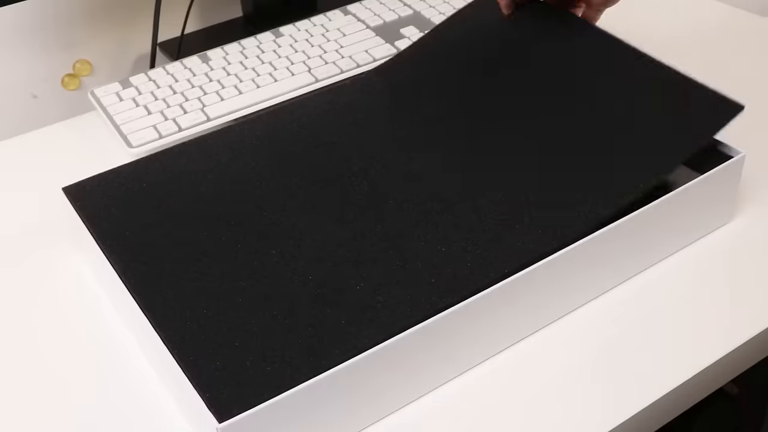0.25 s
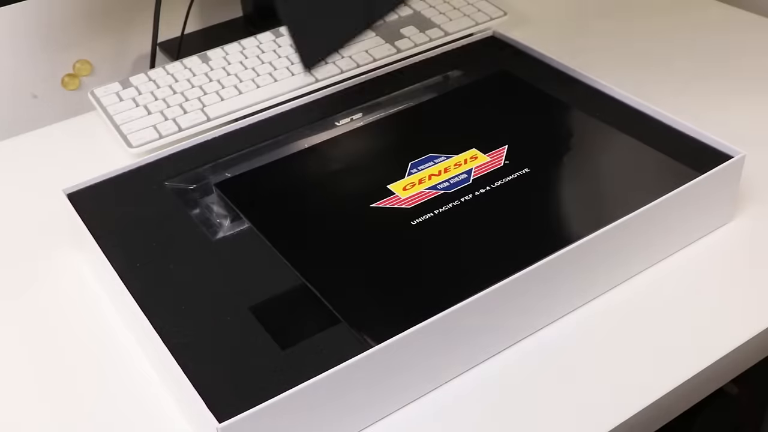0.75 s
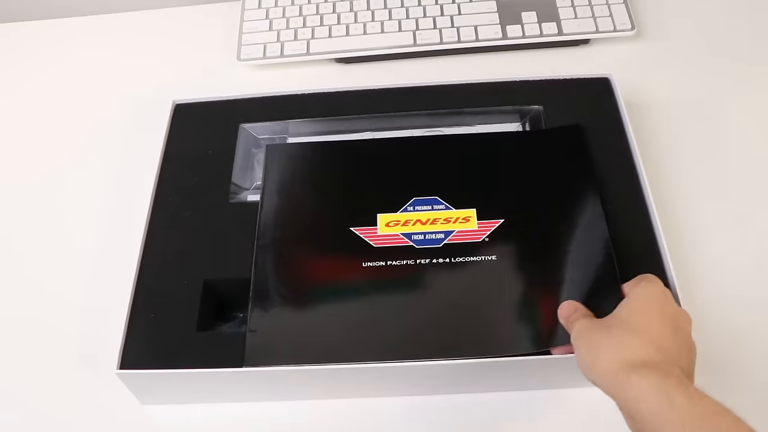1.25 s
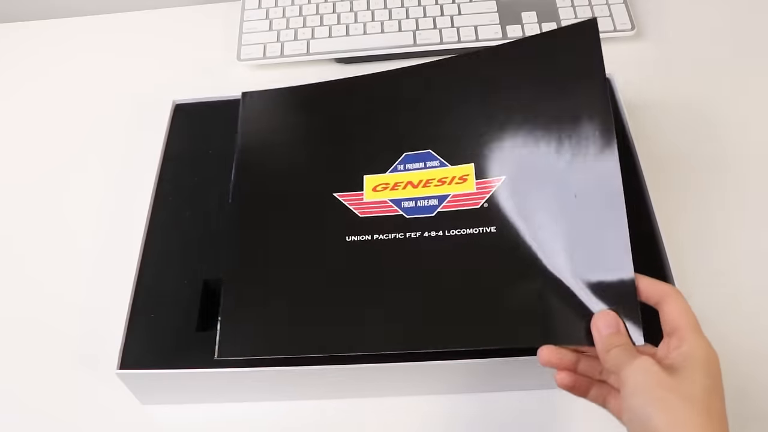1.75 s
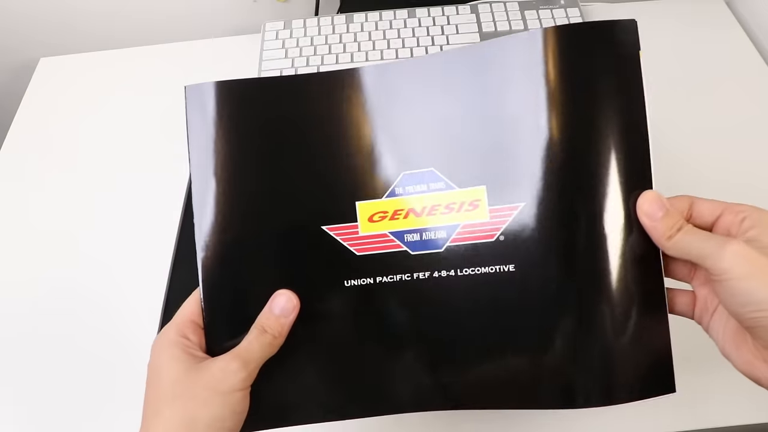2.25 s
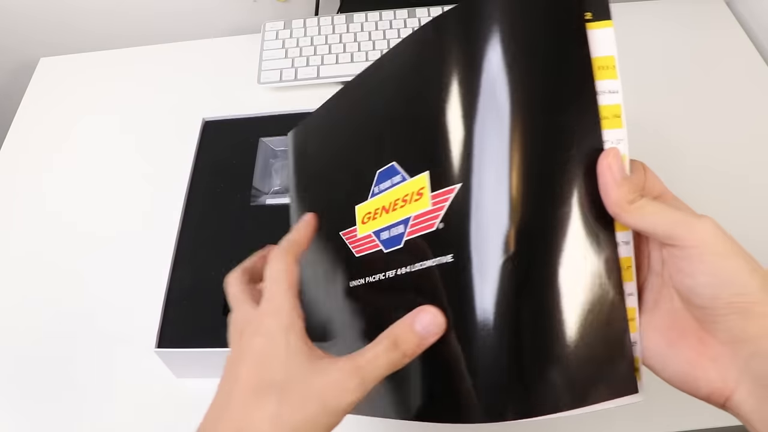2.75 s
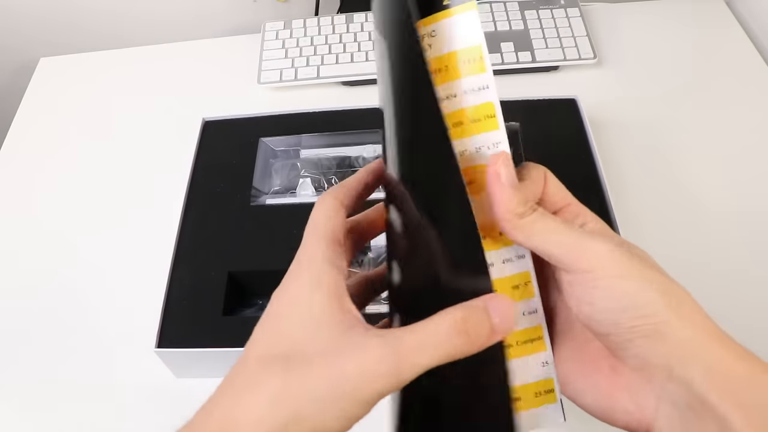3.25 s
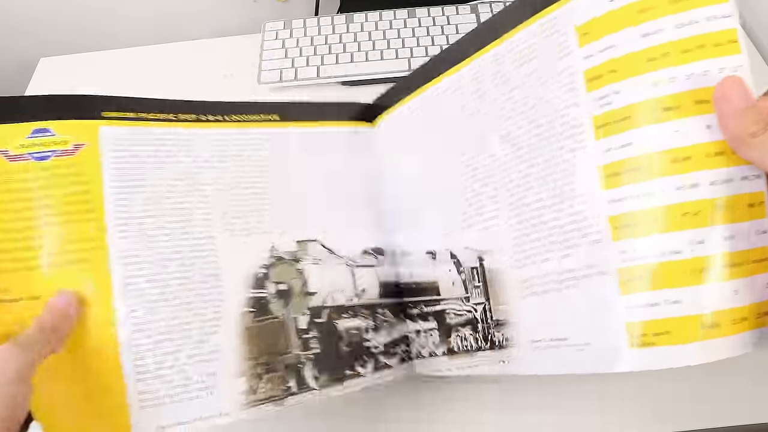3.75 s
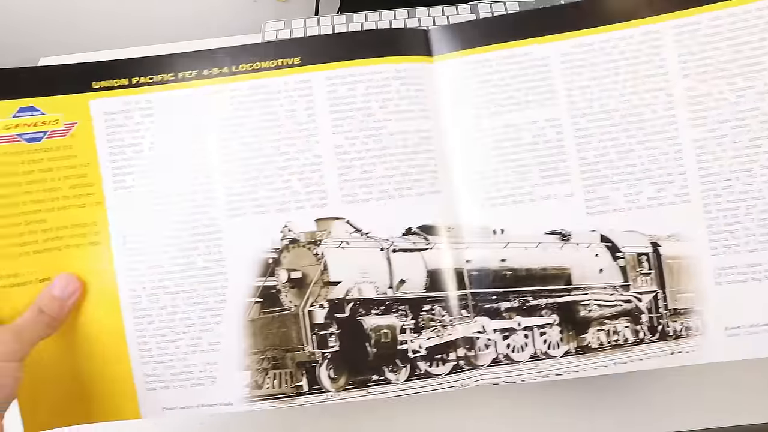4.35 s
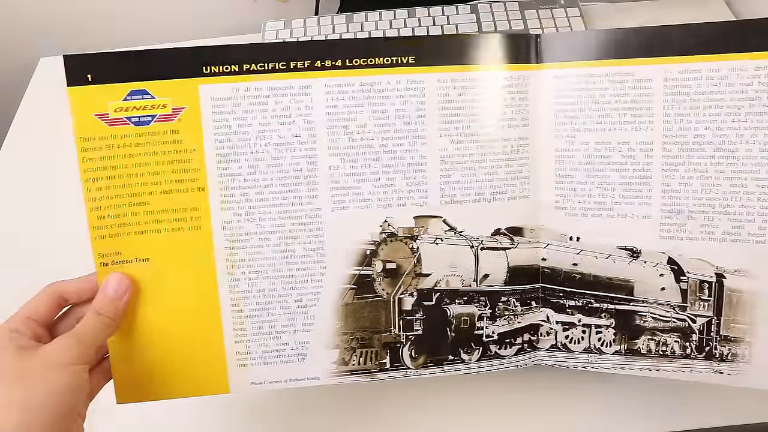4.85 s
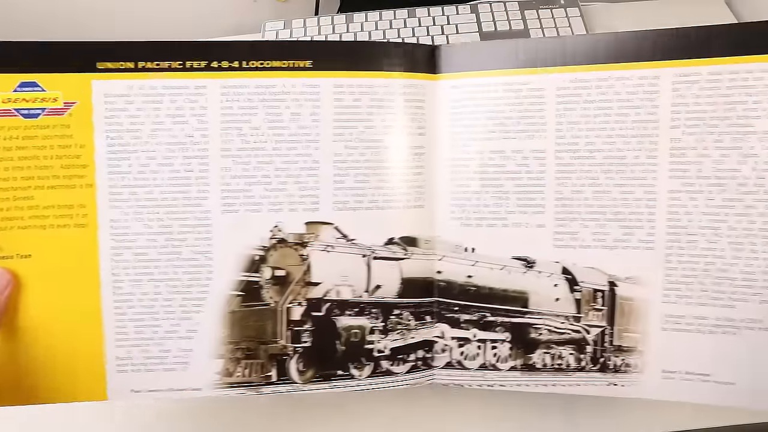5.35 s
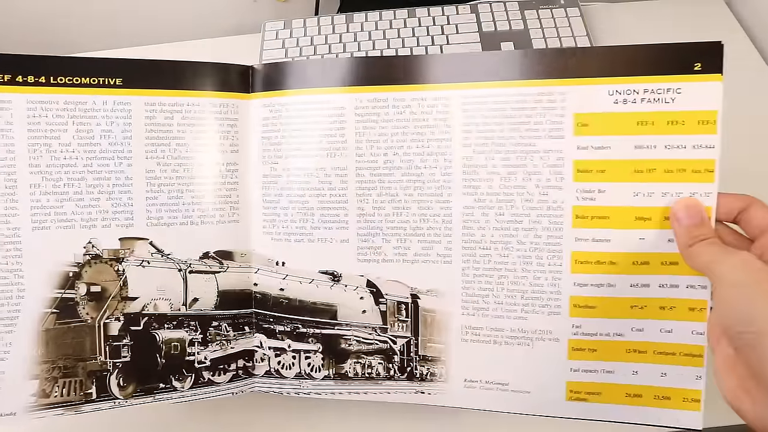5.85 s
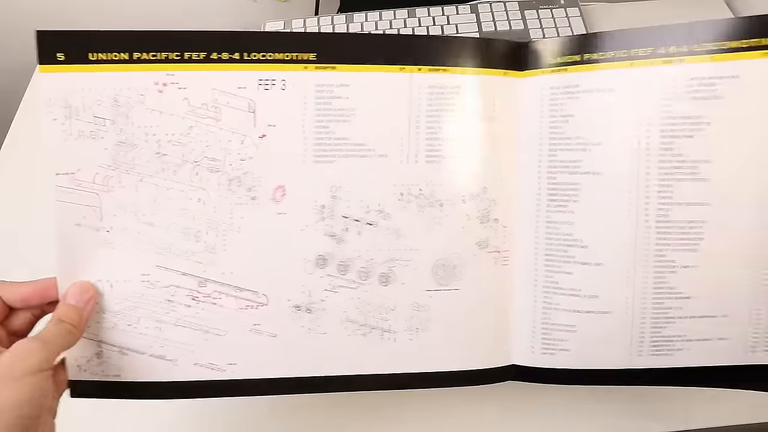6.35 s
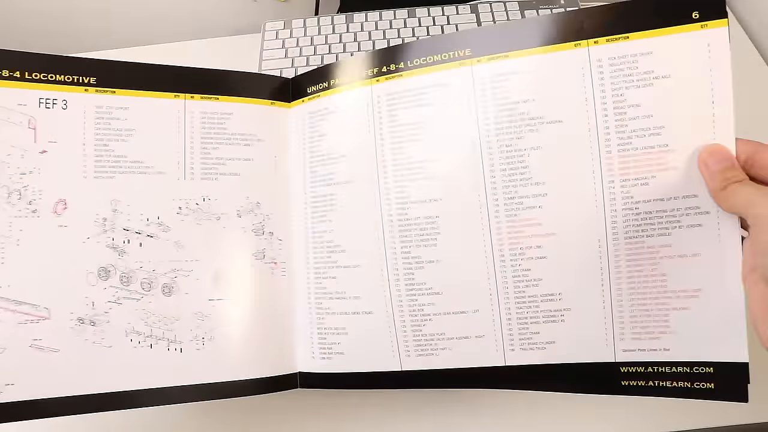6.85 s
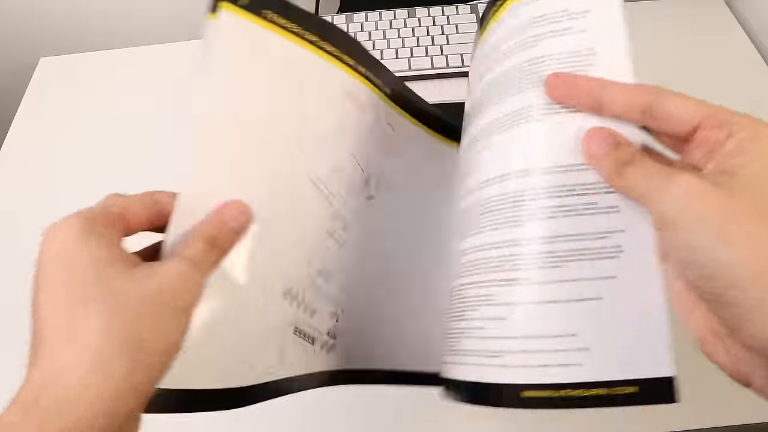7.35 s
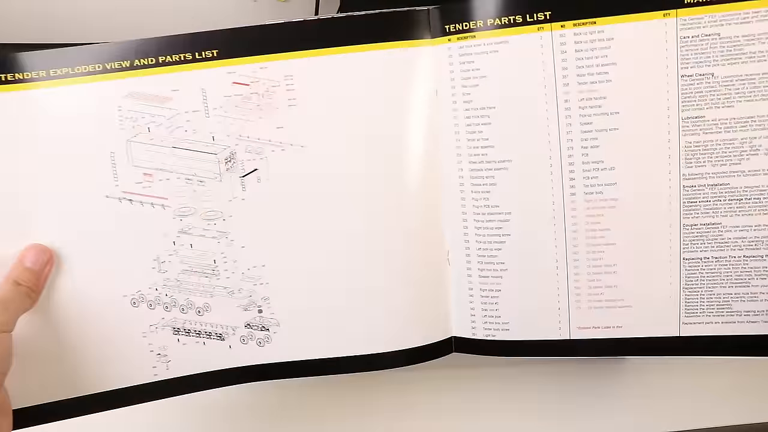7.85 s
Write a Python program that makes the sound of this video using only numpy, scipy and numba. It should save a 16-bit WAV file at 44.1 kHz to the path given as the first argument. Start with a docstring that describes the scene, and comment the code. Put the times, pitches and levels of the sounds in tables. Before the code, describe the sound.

Close stereo capture at a desk: low fan air throughout, quiet box knocks and foam friction first, then hissing, drumming slides of coated paper. One hard edge snap comes before a dense burst of buckling pages. Handling thins to faint bumps and ticks, and finally pages rustle, chirp and crack again, with short small-room reflections.

```python
"""Over the air noise and wavering tones of a computer fan, foam lifted off a box makes its walls ring.
Friction of foam, pages and fingers rasps, drums and hisses; edges tap and flick, and hands bump softly.
The glossy coating also chirps, slipping pages glide in pitch, and creases tick lightly.
Stiff pages bow and snap as bending waves spread; in a quieter stretch a fingertip whistles faintly on the gloss.
A small room answers all but the fan with sparse reflections and a diffuse tail."""
import sys
import numpy as np
from scipy import signal
from scipy.fft import rfft, irfft, next_fast_len
from scipy.io import wavfile
from scipy.ndimage import uniform_filter1d
from numba import njit

SR = 44100
rng = np.random.default_rng(int(sys.argv[2]) if len(sys.argv) > 2 else 0)


def generate_wav(sig):
    """Save sig (samples, or channels by samples) to the path in sys.argv[1] as 16-bit PCM at SR."""
    pcm = np.round(np.clip(np.atleast_2d(sig).T, -1, 1) * 32767).astype(np.int16)
    wavfile.write(sys.argv[1], SR, pcm)


N = 357210
TIME = np.arange(N) / SR
HIT = TIME[:SR // 3]  # time axis of one short event
LEFT_RIGHT = np.array([[1], [-1]])


def undb(db):
    """Logarithmic level: decibels to amplitude gain."""
    return 10 ** (np.asarray(db) / 20)


def unit(x):
    """Mean-power normalisation: scale to rms 1."""
    return x / np.sqrt(np.mean(x ** 2))


def burst(x):
    """Short-time power normalisation: the loudest 3 ms get rms 1."""
    return x / np.sqrt(uniform_filter1d(x ** 2, size=132).max())


def fade(t60, t=HIT):
    """Exponential decay: the level falls 60 dB in t60 seconds."""
    return np.exp(-np.log(1000) * t / t60)


def partial(hz, t60):
    """Damped free oscillation of one mode."""
    return np.sin(2 * np.pi * hz * HIT) * fade(t60)


def colour(x, points):
    """Minimum-phase filtering: a causal response through (f/Hz, level/dB) points, by the folded cepstrum."""
    n = next_fast_len(x.shape[-1] + 2048)
    hz, db = np.transpose(points)
    grid = np.fft.rfftfreq(2048, 1 / SR)
    level = np.interp(np.log(grid + 1), np.log(hz), db)
    cepstrum = irfft(np.log(undb(level)))
    half = len(cepstrum) // 2
    cepstrum[1:half] *= 2
    cepstrum[half + 1:] = 0
    response = irfft(np.exp(rfft(cepstrum)))
    return irfft(rfft(x, n) * rfft(response, n), n)[..., :x.shape[-1]]


@njit
def resonate(x, hz, q):
    """Resonance: a state-variable band-pass whose centre may move every sample."""
    y, b, l = np.empty(len(x)), 0., 0.
    for i in range(len(x)):
        g = np.tan(np.pi * hz[i] / SR)
        v = (b + g * (x[i] - l)) / (1 + g * (g + 1 / q))
        b, l, y[i] = 2 * v - b, l + 2 * g * v, v / q
    return y


def band(x, hz, q):
    """Selective resonance: the same fixed or moving band-pass in each channel."""
    centre = np.clip(np.ones(x.shape[-1]) * hz, 20, .44 * SR)
    return np.array([resonate(channel, centre, float(q)) for channel in x])


def walk(rate):
    """Slow random modulation: chance values, `rate` per second, joined by lines; spread near 1."""
    knots = rng.standard_normal(N // 100)
    return 1.08 * np.interp(TIME * rate, np.arange(len(knots)), knots)


def add(out, s, sound):
    """Superposition: mix a sound in at time s."""
    i = int(s * SR)
    out[:, i:i + sound.shape[-1]] += sound[..., :N - i]


# spectrum of the fan's air noise: f/Hz, relative level/dB
FAN_SPECTRUM = [(15, -68), (25, -44), (48, -10.5), (97, -4.5), (134, -6), (180, -8.5), (263, -0.5),
                (293, -7), (354, -6), (591, -12), (911, -12.5), (1940, -19.5), (2110, -20.5), (6560, -26.5),
                (16000, -34.5)]
# steady tones of fan and mains: f/Hz, relative level/dB
HUM_TONES = [(59.2, -60.5), (258.4, -61), (344.5, -60.5), (403.7, -66.5)]


def fan(air_db=-53, hum_db=-2):
    """Broadband flow noise, wide in the treble, with tones whose phase wavers."""
    mid = unit(colour(rng.standard_normal(N), FAN_SPECTRUM))
    side = unit(colour(rng.standard_normal(N), FAN_SPECTRUM))
    side = colour(side, [(60, -6), (300, -6.5), (1000, -1.5), (4000, 0.5)])
    tones = sum(undb(db + hum_db) * np.sqrt(2) * np.sin(2 * np.pi * hz * TIME + .6 * walk(rate=7))
                for hz, db in HUM_TONES)
    return undb(air_db) * (mid + side * LEFT_RIGHT) + tones


# the lifted foam knocks the cardboard box: t/s, level/dB of the wall ring
BOX_KNOCKS = [(0.1226, -30.5), (0.1459, -25), (0.161, -34)]
# modes of the box walls: f/Hz, relative level/dB, t60/s
BOX_MODES = [(464, 2, 0.099), (747, 3, 0.097), (1080, 11.5, 0.041), (1260, -17, 0.042), (2120, -5, 0.022),
             (2880, -2.5, 0.025)]
# spectrum of drumming sheets, also used for the rattle in the box: f/Hz, relative level/dB
DRUM_SPECTRUM = [(100, -11), (200, -4.5), (320, -1.5), (540, -6), (820, -1), (1100, -6.5), (1900, -16),
                 (6000, -52)]


def knocks(rattle_db=-2.5, rattle_t60=0.067):
    """Modal ringing of the box walls, with a short noisy rattle of what lies inside."""
    out = np.zeros((2, N))
    for s, db in BOX_KNOCKS:
        ring = sum(undb(mode_db) * partial(hz, t60) for hz, mode_db, t60 in BOX_MODES)
        ring = colour(ring, [(3200, 15), (6000, -39)])  # foam is too soft to excite the treble
        rattle = colour(rng.standard_normal((2, len(HIT))), DRUM_SPECTRUM) * fade(rattle_t60)
        add(out, s, undb(db) * (burst(ring) + undb(rattle_db) * burst(rattle)))
    return out


# decay of the room: f/Hz, t60/s
ROOM_DECAY = [(150, 0.5), (500, 0.27), (1500, 0.35), (4000, 0.44), (9000, 0.38), (15000, 0.26)]


def room(x, wet_db=-6, early_db=-9, early_t60=0.049, early_start_s=0.001, tail_rise_s=0.004):
    """Reverberation: sparse reflections from desk and screen, and a tail alike at both ears only in the bass."""
    hz, t60 = np.transpose(ROOM_DECAY)
    t = TIME[:SR // 2]
    grid = np.fft.rfftfreq(len(t), 1 / SR)
    mid, side = rfft(rng.standard_normal((2, len(t))))
    width = np.minimum(grid / 1500, 1)
    spectrum = (mid + width * side * LEFT_RIGHT) / np.sqrt(1 + width ** 2)
    tail = 0
    # overlapping bands, each with its own decay
    for weight, decay in zip(np.eye(len(hz)), t60):
        share = np.interp(np.log(grid + 1), np.log(hz), weight)
        tail = tail + irfft(spectrum * share) * fade(decay, t)
    tail = tail * np.minimum(t / tail_rise_s, 1)
    sparse = rng.random(tail.shape) < .02
    early = rng.standard_normal(tail.shape) * sparse * fade(early_t60, t)
    early = colour(early * (t > early_start_s), [(200, -9.0), (1200, 3.0), (6000, -1.5), (14000, 0.0)])
    response = (undb(wet_db) * unit(tail) + undb(early_db) * unit(early)) / np.sqrt(len(t))
    return np.array([signal.fftconvolve(ear, echo)[:N] for ear, echo in zip(x, response)])


def friction(rate, spread_db, smooth, apart=.6):
    """Stick-slip friction: `rate` tiny uneven releases per second over smooth hiss, partly decorrelated."""
    slips = (rng.random((3, N)) < rate / SR) * rng.standard_normal((3, N))
    slips *= undb(spread_db * np.minimum(rng.exponential(size=(3, N)), 4))
    grain = unit(slips) + smooth * rng.standard_normal((3, N))
    return unit(grain[0] + apart * grain[1:])


def gesture(s, attack, hold, sag_db_per_s, release_s):
    """Contact pressure of one movement: it builds smoothly, eases while held, then dies away."""
    age = np.maximum(TIME - s, 0)
    rise = np.sin(np.pi / 2 * np.minimum(age / max(attack, .001), 1))
    held = np.maximum(age - attack, 0)
    nepers = sag_db_per_s * held * np.log(10) / 20 + np.maximum(held - hold, 0) / release_s
    return rise * np.exp(-np.minimum(nepers, 20))


# a surface slides (foam, then cover and pages):
# t/s, attack/s, hold/s, relative levels/dB of rub, sheet drumming and fine hiss
SLIDING_STROKES = [ (0.157, 0.017, 0.036, -68, -41.5, -57), (0.418, 0.0044, 0.026, -40.5, -37.5, -50.5),
                   (0.469, 0.052, 0.072, -52, -44.5, -51.5), (0.599, 0.075, 0.019, -53, -44, -47),
                   (0.715, 0.049, 0.069, -55, -49.5, -54.5), (0.845, 0.0075, 0.08, -52, -45, -51.5),
                   (0.937, 0.033, 0.72, -66, -59, -57.5), (1.565, 0.015, 0.013, -45, -46, -52.5),
                   (2.002, .004, 0.025, -52, -52, -61), (2.346, 0.032, 0.035, -42, -49, -36),
                   (2.46, 0.018, 0.025, -39.5, -55, -54), (2.529, 0.011, 0.088, -40, -56, -52.5),
                   (2.632, 0.011, 0.014, -40, -60, -51), (2.735, .005, .004, -38.5, -60, -48.5),
                   (2.759, 0.021, 0.05, -66, -58, -48), (2.987, 0.0088, 0.032, -40.5, -42.5, -53),
                   (3.054, 0.0079, 0.055, -39.5, -42, -55), (3.125, 0.02, 0.15, -38.5, -68, -48),
                   (3.387, 0.2, 0.016, -41, -68, -45), (3.59, 0.016, 0.016, -47, -46, -68),
                   (3.677, 0.018, 0.053, -41, -37, -47), (3.726, 0.038, 0.021, -45, -56, -40),
                   (3.828, 0.013, 0.077, -72, -47.5, -55.5), (3.937, 0.041, 0.006, -34, -33.5, -35),
                   (4.048, .004, 0.048, -43.5, -43, -46), (4.2, 0.0089, 0.079, -52.5, -51, -55),
                   (4.412, 0.011, 0.017, -48, -44, -45.5), (4.436, 0.023, 0.028, -55, -58, -44),
                   (4.493, 0.0075, 0.0068, -58, -43, -52), (4.521, 0.099, 0.017, -48.5, -48, -46),
                   (4.64, .02, 0.053, -59, -73, -55.5), (4.77, .01, 0.074, -62, -53, -53),
                   (6.408, 0.12, 0.095, -50.5, -51, -58), (7.167, .009, 0.08, -48, -44, -52),
                   (7.234, 0.047, 0.069, -35.5, -40.5, -41), (7.36, 0.0087, 0.073, -37, -38.5, -40.5),
                   (7.464, .01, 0.11, -40, -45, -46), (7.593, 0.058, 0.009, -38, -41.5, -48),
                   (7.691, .01, 0.052, -36, -35.5, -71), (7.778, 0.02, 0.052, -43, -36, -40),
                   (7.865, 0.075, 0.058, -48.5, -49, -44)]
# spectra of the rubbing contact and of the coating's hiss: f/Hz, relative level/dB
RUB_SPECTRUM = [(410, -42.5), (700, -12.5), (858, -6), (950, -5), (1150, -6), (1680, -1), (2740, -8.5),
                (4000, -9.5), (8000, -22.5), (10400, -62), (17600, -120)]
HISS_SPECTRUM = [(1000, -10), (3000, 1), (5200, -1), (6800, -0.5), (8600, -1), (10500, -4.5), (13000, -11),
                 (16000, -14)]
# free spans of a page resonate: nominal f/Hz, mean relative level/dB
PAGE_SPANS = [(1500, -9.5), (2700, 1.5), (4200, 0.5)]


def sliding(rub_db=-2, drum_db=-3, hiss_db=-1, judder_db=1.45, span_db=-2):
    """Stick-slip rasps at the contact, drums on the sheet and hisses on its coating; the grip comes and goes."""
    # the grip eases as the hand moves on
    pressure = np.array([gesture(*row[:3], sag_db_per_s=17.5, release_s=0.018) for row in SLIDING_STROKES])
    rub, drum, hiss = undb(np.array(SLIDING_STROKES)[:, 3:]).T @ pressure
    grains = colour(friction(rate=1700, spread_db=2.6, smooth=.5, apart=.8), RUB_SPECTRUM)
    fine = colour(friction(rate=3000, spread_db=3.5, smooth=.9, apart=1.3), HISS_SPECTRUM)
    beats = colour(friction(rate=500, spread_db=-0.5, smooth=0.85, apart=0.23), DRUM_SPECTRUM)
    spans = 0
    # each free span keeps changing its length, and catches and lets go on its own
    for hz, db in PAGE_SPANS:
        catch = undb(db + 4 * walk(rate=60))
        centre = hz * 2 ** (.25 * walk(rate=16))
        spans = spans + catch * unit(band(grains, centre, q=5))
    sound = undb(rub_db) * rub * unit(unit(grains) + undb(span_db) * unit(spans))
    sound += undb(hiss_db) * hiss * unit(fine)
    sound += undb(drum_db) * drum * unit(beats)
    return sound * undb(judder_db * walk(rate=70))


# modes of the booklet as a whole: nominal f/Hz, relative level/dB, t60/s
BOOKLET_MODES = [(147, 4.5, 0.075), (217.8, 2.5, 0.33), (254, 10, 0.077), (316, 18, 0.25), (378, 3, .16),
                 (814, 10.5, 0.13), (970, -5, 0.09)]


def blow(row, crack, spread_s, q, edge_echo, crack_echo, crack_t60, body_db, crack_db, core_db, apart):
    """Dispersive bending wave: it bounces between page edges, cracks at the fold and shakes the booklet."""
    _, db, hz, low_db, top_db, pan_db, t60 = row
    noise = rng.standard_normal((6, len(HIT)))
    detune = 1 + 0.012 * rng.standard_normal(len(BOOKLET_MODES))
    start = HIT[:SR // 80]
    # the stiffer short waves arrive first, so a spread-out push is a quick downward sweep
    delay = spread_s / (1 + np.fft.rfftfreq(len(start), 1 / SR) / 2500)
    phase = 2 * np.pi * np.cumsum(delay) * SR / len(start)
    push = irfft(np.exp(-1j * phase), len(start))
    push = np.pad(push, (0, len(HIT) - len(start)))
    push *= np.clip(2 - 2 * HIT / start[-1], 0, 1)

    def with_echo(source, decay, share):
        """Multiple reflection: the push followed by a decaying noisy tail."""
        tail = (source[0] + apart * source[1:]) * fade(decay) * (1 - np.exp(-HIT / spread_s)) ** 2
        return push + share * tail / np.sqrt(np.sum(tail ** 2, axis=1, keepdims=True))

    edge_wave = with_echo(noise[:3], max(t60, .004), edge_echo)
    fold_wave = with_echo(noise[3:], crack_t60, crack_echo)
    core = band(edge_wave, hz, q)
    # a wide fold cannot radiate short waves
    core = colour(core, [(hz / 6, -7), (hz / 2, 0), (hz * 2.55, 0), (hz * 5, -18)])
    body = sum(undb(mode_db) * partial(f * d, ring) for (f, mode_db, ring), d in zip(BOOKLET_MODES, detune))
    sound = undb(core_db) * burst(core)
    sound += undb(low_db + body_db) * burst(body)
    sound += undb(top_db + crack_db) * burst(colour(fold_wave, crack))
    return sound * undb(db + pan_db * LEFT_RIGHT / 2)


# edges are tapped or flick, and between these pages bow and pop through; both tables:
# t/s of first contact or strain, shortly before the sound peaks, relative level/dB, centre f/Hz,
# relative booklet body/dB, relative crack/dB, left minus right/dB, ring t60/s
EDGE_TAPS = [(0.4241, -33, 710, -13, -8, 0, 0.047), (1.711, -24, 830, -16.5, -40, 2, 0.054),
             (2.908, -1.5, 864, -25, -17, 1, 0.027), (3.058, -25, 815, -15.5, -31, 1, 0.058),
             (3.27, -10.5, 1330, -33, -43, -2, 0.0086), (3.395, -24, 1140, -27, -15.5, -2, 0.009),
             (3.842, -26.5, 750, -1, -36, -0.5, 0.091), (3.987, -11.5, 790, -14, -21, 2, 0.021),
             (3.993, -11.5, 696, -10, -40, -1.5, 0.11), (4.004, -19.5, 890, -1.5, -33, -1.5, 0.034),
             (4.015, -21.5, 915, -14, -32, -6, 0.016), (4.04, -17.5, 720, -31, -34, 2, 0.018),
             (5.288, -20.5, 696, -7, -52, -0.5, 0.043), (6.631, -24.5, 950, -18, -33, -2, 0.029),
             (6.769, -37.5, 830, -6, -39, 2, 0.035), (7.168, -31.5, 1300, -20, -12, -2, 0.036),
             (7.383, -11.5, 1300, -25, -34, -1, 0.018), (7.56, -21.5, 900, -30, -20, -1, 0.028),
             (7.6723, -6, 1440, -31, -4, 1.5, 0.036), (7.81, -23.5, 1200, -15, -21, -1, 0.03)]
PAGE_BUCKLES = [(3.627, -1, 1674, -41, -16.5, 1, 0.024), (3.638, -5, 1740, -28, -16, -1, 0.025),
                (3.651, -8.5, 1920, -19, -41, -1.5, 0.02), (3.961, -13.5, 1620, -20, -6.5, 3, 0.033),
                (3.974, -11, 800, -20.5, -11.5, -1, 0.012), (4.426, -31, 1510, -18, -23, 2, 0.075),
                (7.313, -23, 1970, -12, -16, -3, 0.037), (7.3717, -7, 2780, -48, -4, -0.5, 0.0099)]
# a flicked edge cracks more dully than a fold popping through: f/Hz, relative level/dB
EDGE_CRACK_SPECTRUM = [(1200, -41), (2600, 10), (4600, 9.5), (6000, 4.5), (7200, -11), (8600, -6),
                       (10500, -14.5), (13000, -19), (16000, -13)]
FOLD_CRACK_SPECTRUM = [(1200, -29), (2600, 12), (4600, 4), (6800, -4.5), (8500, 3.5), (10500, -8),
                       (12500, -10), (16000, -19)]


def snaps(onset_s=.003, creak_db=-14, creak_rise_s=0.004):
    """Impact and snap-through: taps are sudden; a buckle creaks as strain builds, then runs through the page."""
    out = np.zeros((2, N))
    for row in EDGE_TAPS:
        tap = blow(row, EDGE_CRACK_SPECTRUM, spread_s=0.00045, q=2.46, edge_echo=2.0, crack_echo=1.0,
                   crack_t60=0.012, body_db=-2.0, crack_db=0.5, core_db=-7.5, apart=0.95)
        add(out, row[0] + onset_s, tap)
    lead = HIT[:SR // 30]
    for row in PAGE_BUCKLES:
        pop = blow(row, FOLD_CRACK_SPECTRUM, spread_s=0.002515, q=2.6, edge_echo=1.0, crack_echo=1.0,
                   crack_t60=0.0088, body_db=1.5, crack_db=1.0, core_db=-6.0, apart=1.0)
        add(out, row[0] + onset_s / 2, pop)
        creak = unit(colour(rng.standard_normal((2, len(lead))), RUB_SPECTRUM))
        creak *= np.exp((lead - lead[-1]) / creak_rise_s)
        add(out, row[0] + onset_s - lead[-1], undb(row[1] + creak_db) * creak)
    return out


# soft bumps of hands, foam and booklet: t/s, relative level/dB, f/Hz
SOFT_BUMPS = [(0.894, -30.5, 295), (0.924, -34, 315), (1.217, -31.5, 303), (1.253, -30.5, 142),
              (1.258, -29.5, 303), (2.858, -38, 316), (2.919, -19.5, 147), (2.931, -17, 280),
              (3.645, -20, 319), (3.89, -30.5, 316.1), (3.983, -17.5, 424), (4.399, -37, 175),
              (5.803, -42.5, 221), (5.818, -41.5, 186), (5.932, -36.5, 370), (6.195, -30.5, 73),
              (6.222, -35, 87), (7.78, -34, 342), (7.849, -26.5, 373)]


def bumps(t60=0.16, ring_t60=0.068, shudder_db=-3, gain_db=-7):
    """Soft impact: a damped low ring with a short, dull shudder."""
    out = np.zeros((2, N))
    for s, db, hz in SOFT_BUMPS:
        push = rng.standard_normal((1, len(HIT))) * fade(t60)
        shudder = band(band(push, hz * 1.3, q=0.56), hz, q=0.82)
        ring = partial(hz, ring_t60) * (1 - np.exp(-HIT * hz))
        add(out, s, undb(db + gain_db) * burst(burst(ring) + undb(shudder_db) * burst(shudder)))
    return out


# the coating catches and chirps: t/s, relative level/dB, f/Hz, length/s (three times the drive's rise)
COATING_SQUEAKS = [(1.999, -43.5, 4180, 0.02), (2.662, -30.5, 2780, 0.0076), (2.78, -31.5, 2850, 0.0042),
                   (3.306, -31, 2250, 0.01), (7.3477, -18, 2820, 0.0067), (7.734, -17, 1600, 0.006)]


def squeaks(q=6, gain_db=-5):
    """Friction-driven resonance: a brief run of stick and slip rings one narrow mode of the page."""
    out = np.zeros((2, N))
    for s, db, hz, length in COATING_SQUEAKS:
        noise = rng.standard_normal((3, len(HIT)))
        age = 3 * HIT / max(length, .002)
        drive = (noise[0] + .5 * noise[1:]) * age * np.exp(-age)
        chirp = band(band(drive, hz, q), hz, q=1.0)
        add(out, s, undb(db + gain_db) * burst(chirp))
    return out


# a page slips over another's edge: t/s, attack/s, hold/s, relative level/dB,
# first and last nominal f/Hz of the resonance, relative rasp/dB
PAGE_SLIPS = [(2.135, 0.057, .02, -49.5, 9800, 8200, 1), (2.295, 0.026, 0.0053, -42, 3660, 3300, -12),
              (2.321, 0.033, 0.073, -22, 3500, 1410, -5), (2.467, .015, 0.015, -38, 1500, 1600, -14),
              (2.526, 0.016, 0.096, -39, 1700, 1500, -13), (2.768, 0.0037, 0.011, -42, 2930, 2920, 8),
              (3.056, .004, .045, -39.5, 810, 790, -12), (3.138, 0.024, 0.098, -35.5, 1720, 1830, -12),
              (3.67, 0.063, 0.03, -33.5, 1950, 2050, -14), (4.555, .05, .02, -46, 1900, 1090, -21),
              (7.173, 0.0092, 0.031, -41, 690, 620, -10.5), (7.414, 0.019, 0.014, -28, 2500, 1750, -9),
              (7.469, .01, 0.011, -37, 1700, 1500, -9), (7.961, 0.011, .012, -46.5, 3000, 2920, -8)]
# spectrum of the rasp of a page's edge: f/Hz, relative level/dB
RASP_SPECTRUM = [(500, -28), (1100, 0), (2500, 12), (4000, -0.5), (5700, 4), (7000, -26), (10500, -14),
                 (13000, -30), (16000, -14)]


def slipping(gain_db=-2, pan_db=-3, rasp_power=2.4):
    """Resonance of a varying free length: it changes by fits, so the scrape glides unevenly."""
    glide = []
    for s, attack, hold, _, first, last, _ in PAGE_SLIPS:
        glide += [(s, first), (s + attack + hold, last)]
    grains = friction(rate=3000, spread_db=3.5, smooth=1.0, apart=0.66)
    centre = np.interp(TIME, *np.transpose(glide)) * 2 ** (.09 * walk(rate=150))
    ring = band(band(grains, centre, q=3.2), centre, q=1.3) / np.sqrt(centre)
    # the bent page loses its tension, then drops off the edge
    pressure = np.array([undb(row[3] + gain_db) * gesture(*row[:3], sag_db_per_s=81, release_s=0.0042)
                         for row in PAGE_SLIPS])
    # a longer span rasps more
    rasp = unit(colour(grains, RASP_SPECTRUM)) * np.minimum(2000 / centre, 1.3) ** rasp_power
    rasp_pressure = undb(np.array(PAGE_SLIPS)[:, -1]) @ pressure
    sound = pressure.sum(axis=0) * unit(ring) + rasp_pressure * rasp
    return sound * undb(pan_db * LEFT_RIGHT / 2)


# a corner or crease flicks past a fingertip: t/s, relative level/dB, centre f/Hz
CREASE_TICKS = [(2.732, -41, 7000), (4.78, -44, 1000), (6.521, -34.5, 6060), (6.558, -42, 5940),
                (6.5987, -35, 3540), (7.563, -24, 3400), (7.602, -35, 3300), (7.644, -30, 3000),
                (7.664, -29, 3200), (7.7788, -28, 1510), (7.825, -42, 2300), (7.999, -48, 6500)]


def ticks(t60=0.018, q=1.0, gain_db=-3, apart=1.0):
    """Light impulsive excitation: tiny crisp cracks, too light to shake the booklet."""
    out = np.zeros((2, N))
    for s, db, hz in CREASE_TICKS:
        noise = rng.standard_normal((3, len(HIT))) * fade(t60)
        crack = band(noise[0] + apart * noise[1:], hz, q)
        crack = colour(crack, [(9500, -1), (14000, -7)])
        add(out, s, undb(db + gain_db) * burst(crack))
    return out


# a fingertip whistles faintly on the gloss: t/s, length/s, level/dB, first f/Hz, last f/Hz
FINGER_WHISTLE = (5.265, .08, -70, 11700, 10400)


def whistle():
    """Periodic stick-slip, very fast: the pitch sinks ever faster as the finger slows."""
    s, length, db, first, last = FINGER_WHISTLE
    part = np.clip((TIME - s) / length, 0, 1)
    hz = first + (last - first) * part ** 2
    swell = np.sqrt(2 * np.abs(np.sin(np.pi * part)))
    return undb(db) * swell * np.sin(2 * np.pi * np.cumsum(hz) / SR)


def scene(left_lag_s=.000022):
    """Interaural differences: direct sound reaches the left a moment later and recoloured; room and fan join."""
    paper = knocks() + snaps() + ticks() + squeaks() + whistle() + bumps() + sliding() + slipping()
    lag = np.exp(-2j * np.pi * np.fft.rfftfreq(N, 1 / SR) * left_lag_s)
    late = irfft(rfft(paper[0]) * lag, N)
    left = colour(late, [(400, 0.7), (1800, -1.5), (4000, -0.95), (12000, -0.2)])
    echoes = colour(room(paper), [(200, -0.5), (2000, -3.0), (5000, -2.0), (12000, -3.5)])
    return np.array([left, paper[1]]) + echoes + fan()


def record(dry):
    """Saturation and band limiting: the highest peaks are rounded and the top above 16 kHz is cut."""
    low_pass = signal.ellip(10, .2, 80, 16000, fs=SR, output="sos")
    return signal.sosfilt(low_pass, np.tanh(dry))


dry = scene()
out = record(dry)
generate_wav(out)
```